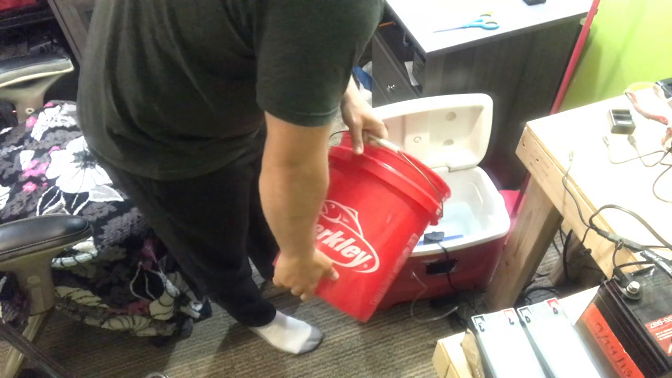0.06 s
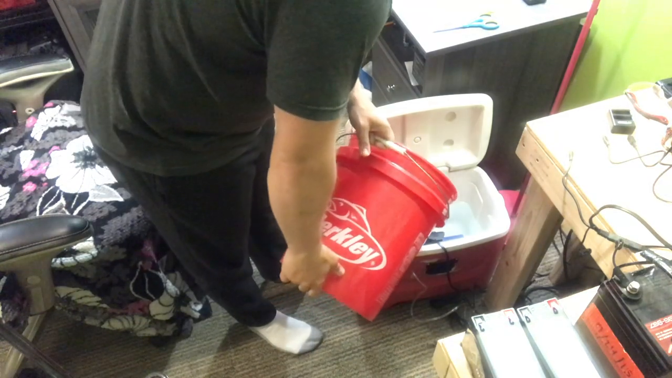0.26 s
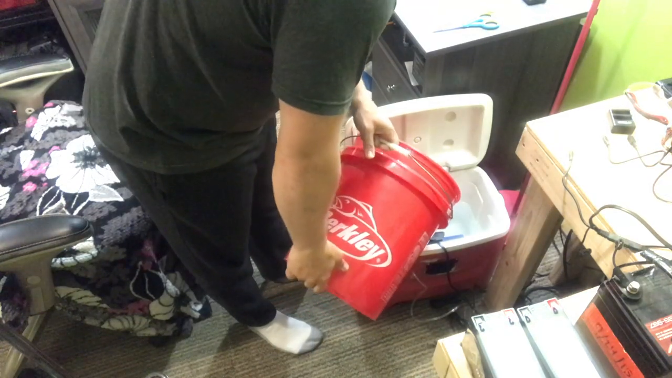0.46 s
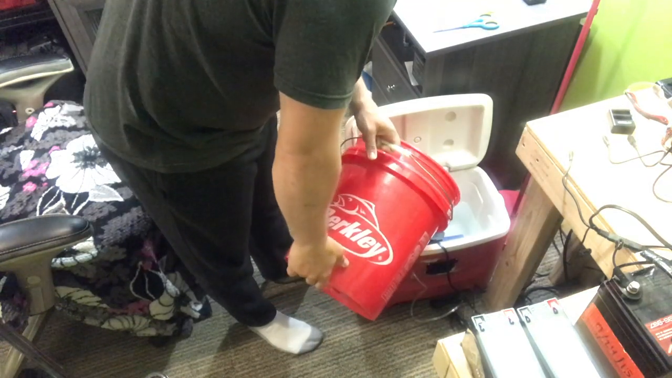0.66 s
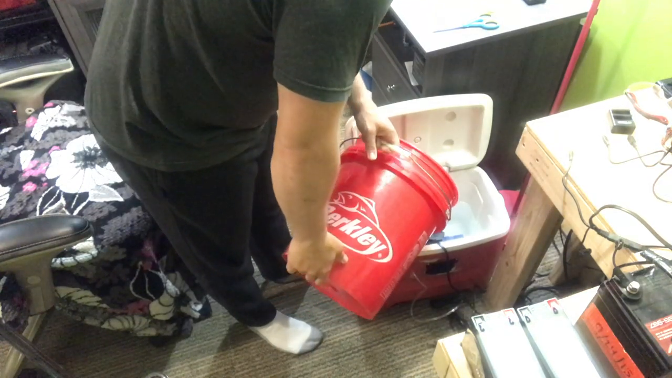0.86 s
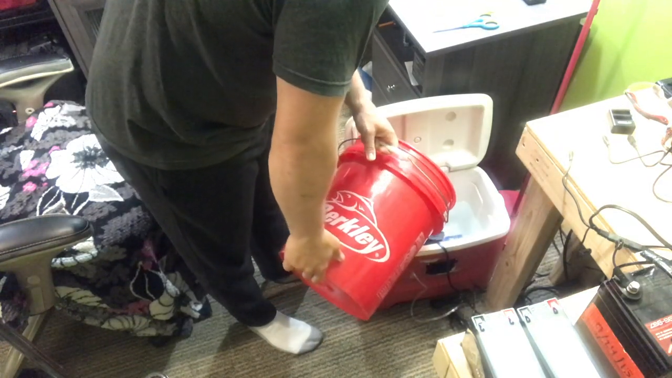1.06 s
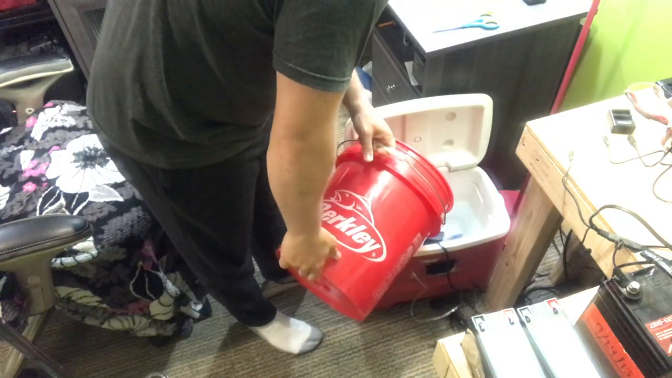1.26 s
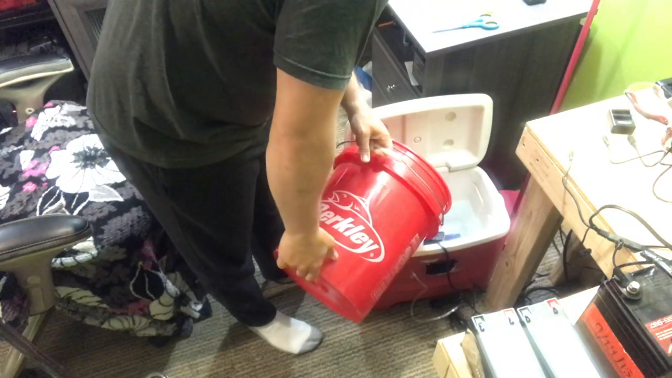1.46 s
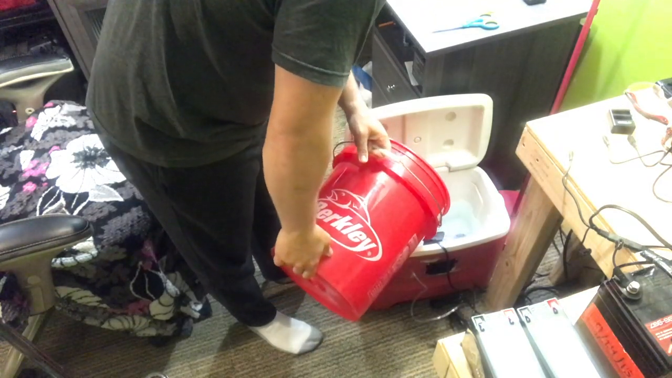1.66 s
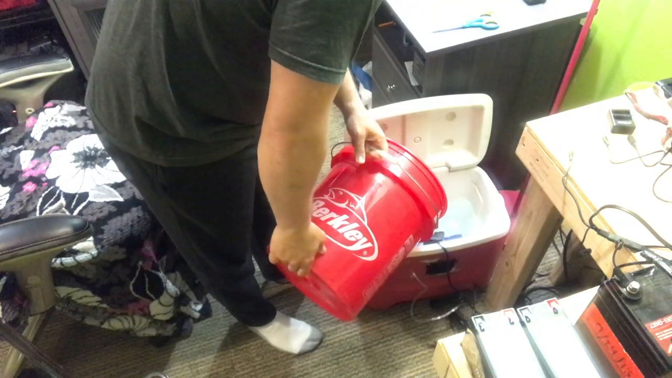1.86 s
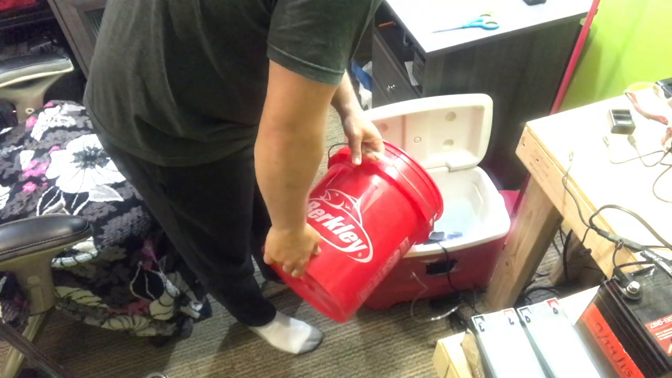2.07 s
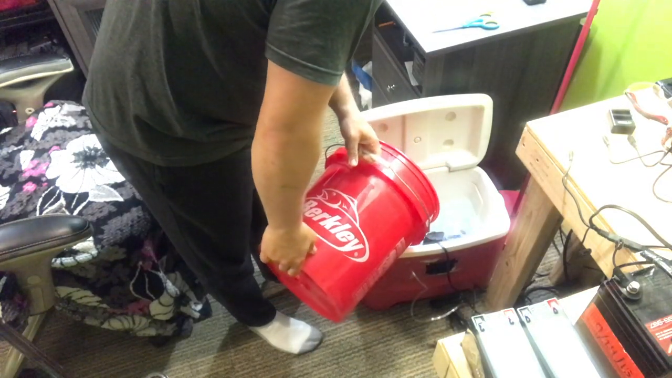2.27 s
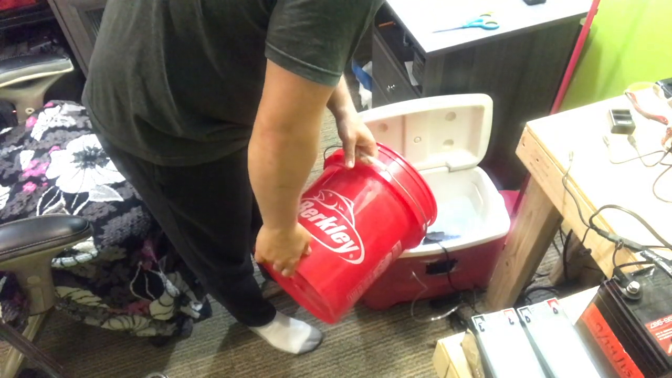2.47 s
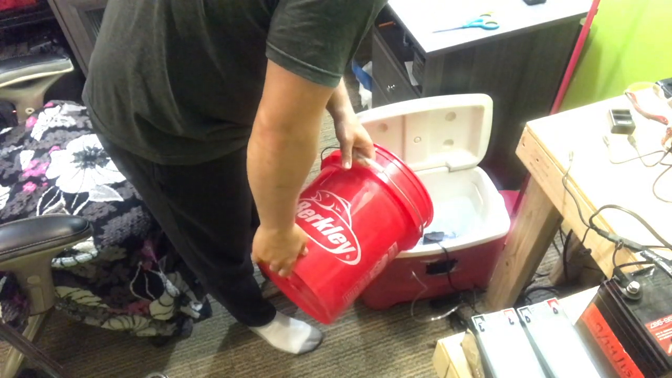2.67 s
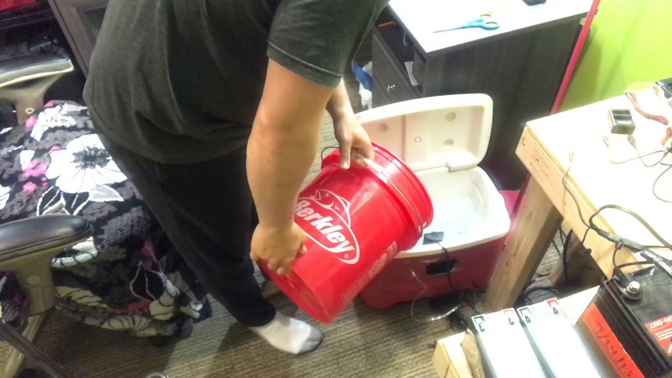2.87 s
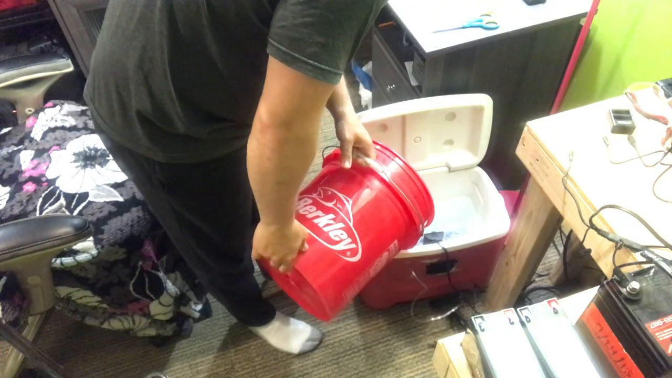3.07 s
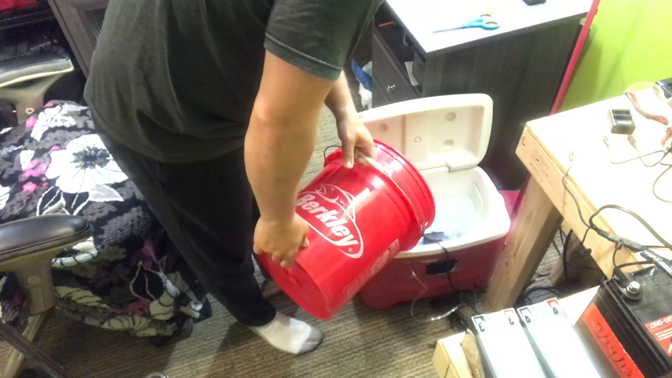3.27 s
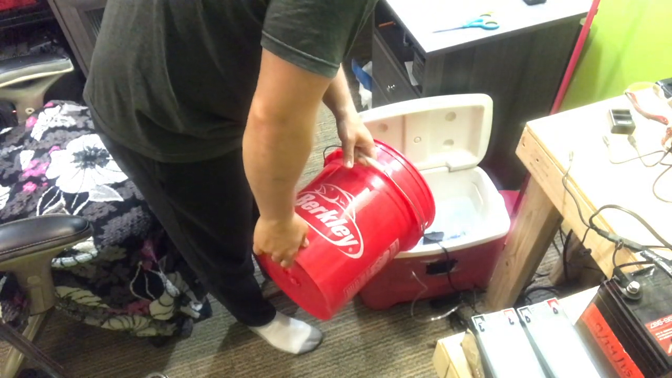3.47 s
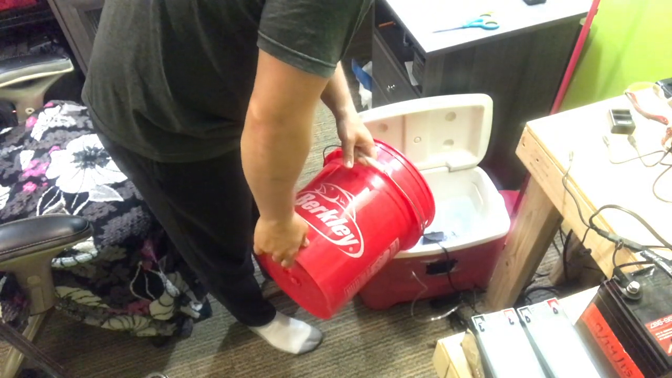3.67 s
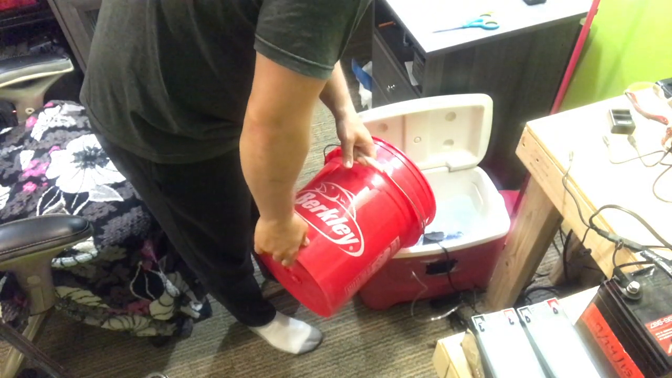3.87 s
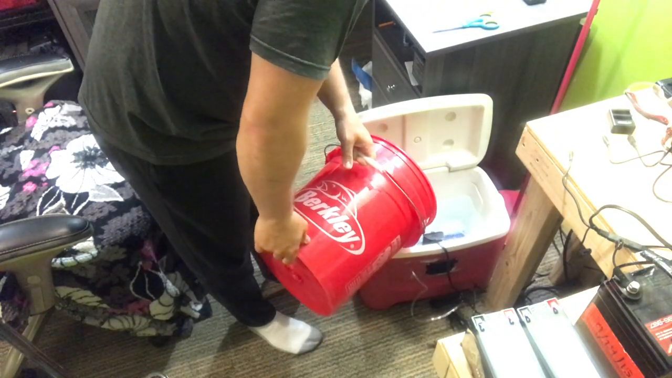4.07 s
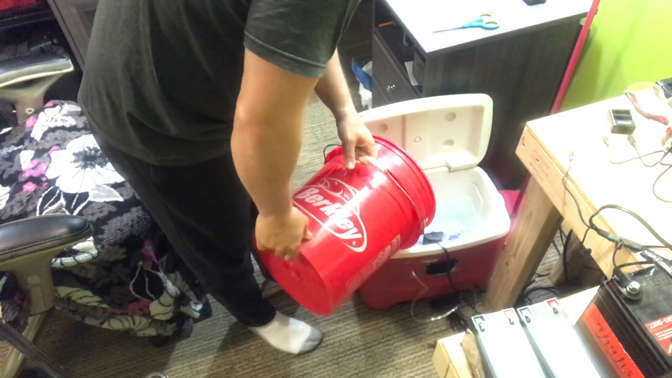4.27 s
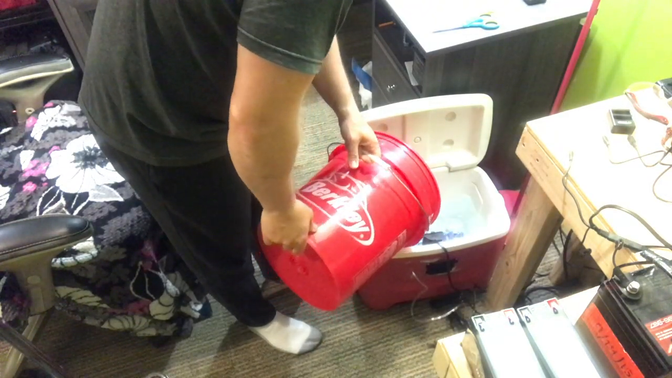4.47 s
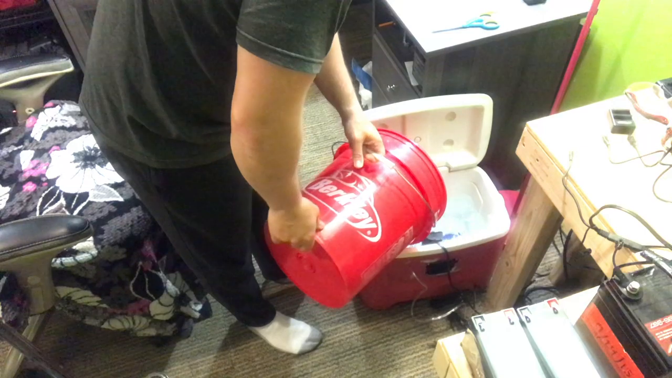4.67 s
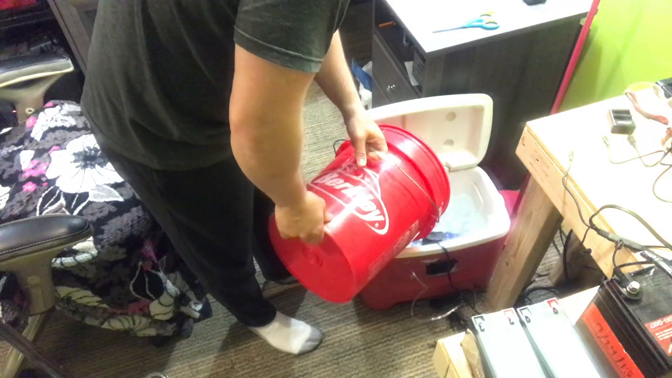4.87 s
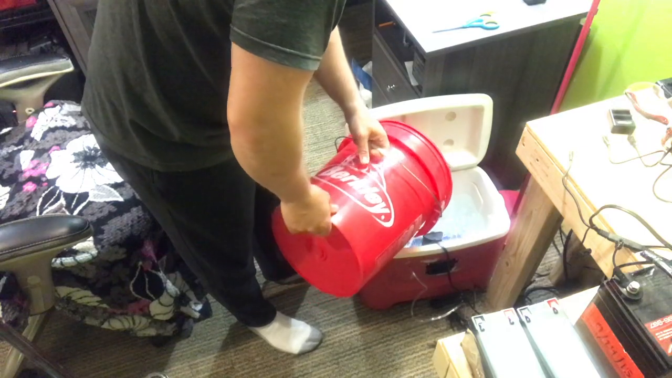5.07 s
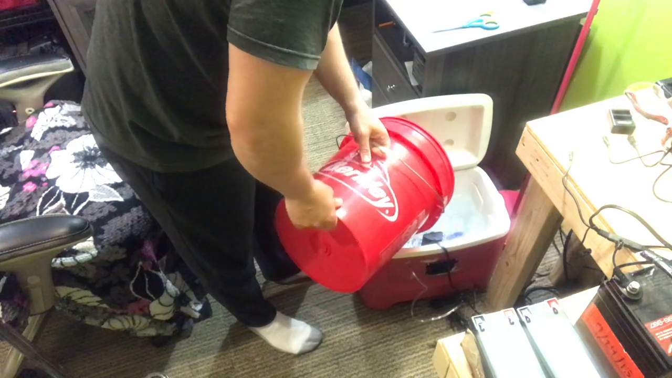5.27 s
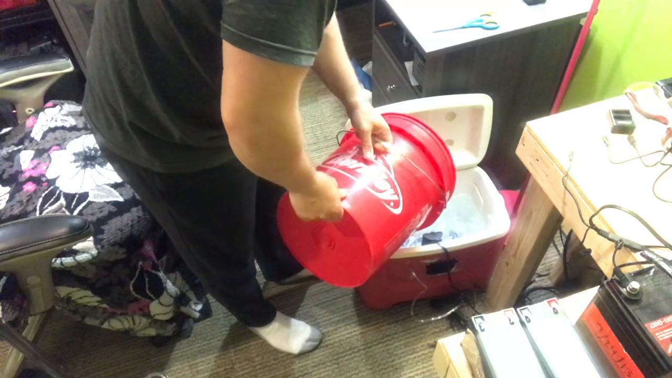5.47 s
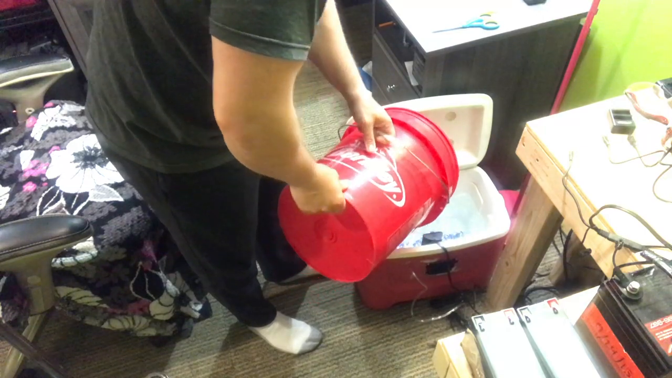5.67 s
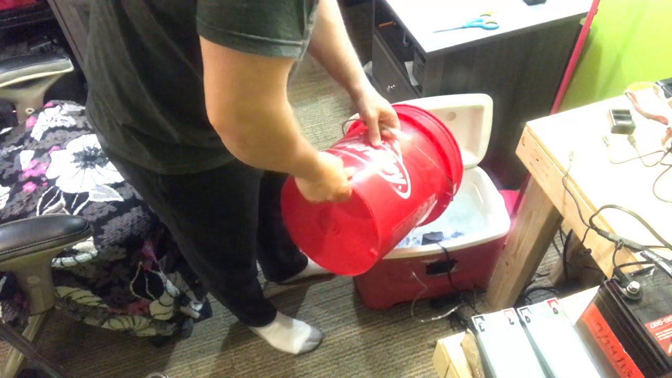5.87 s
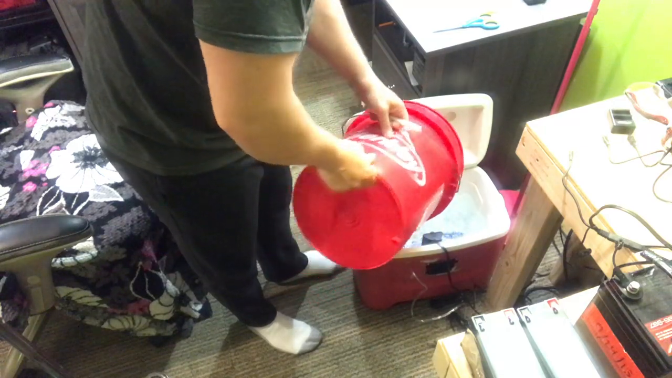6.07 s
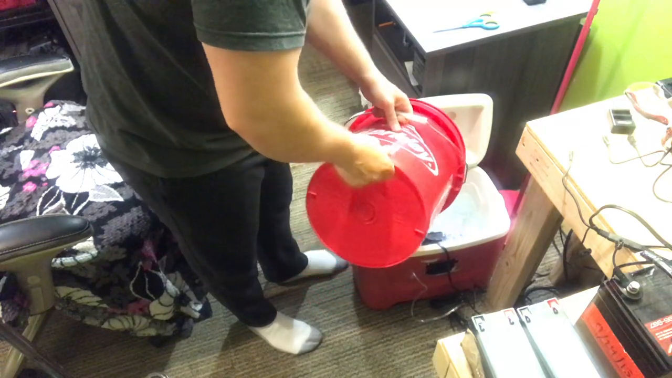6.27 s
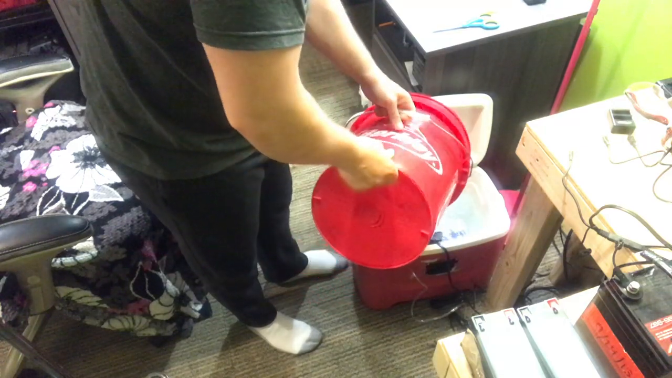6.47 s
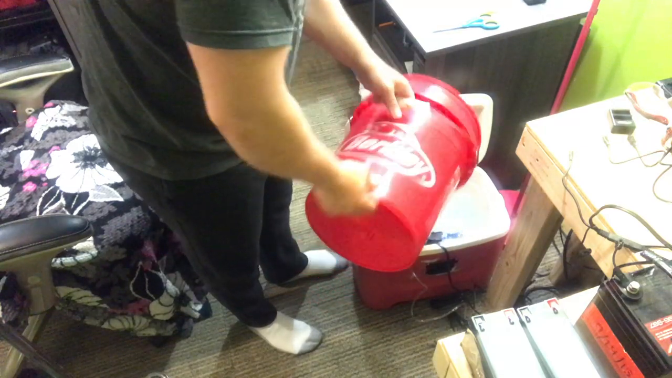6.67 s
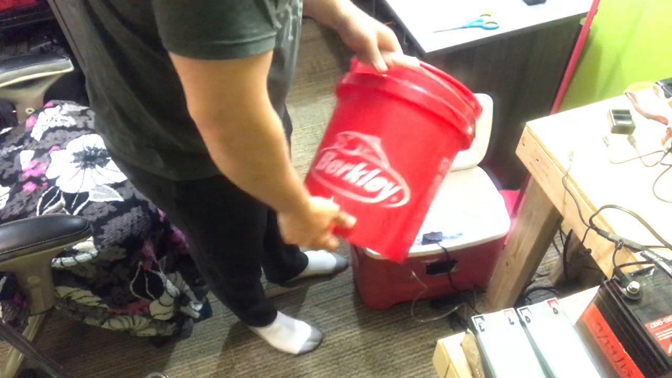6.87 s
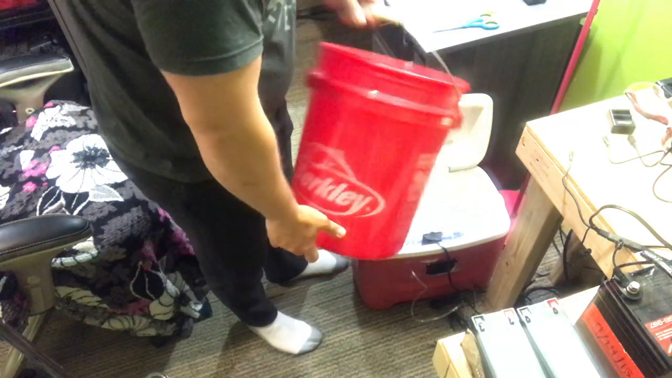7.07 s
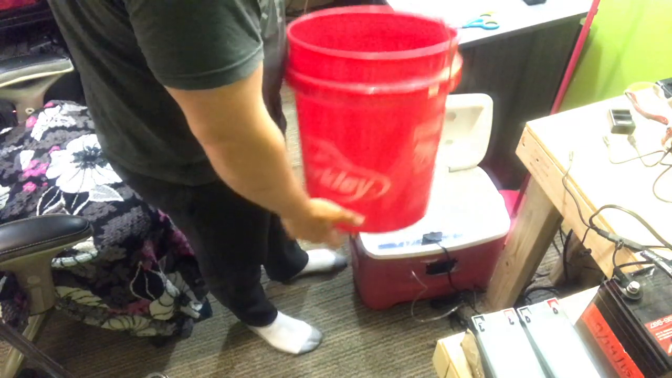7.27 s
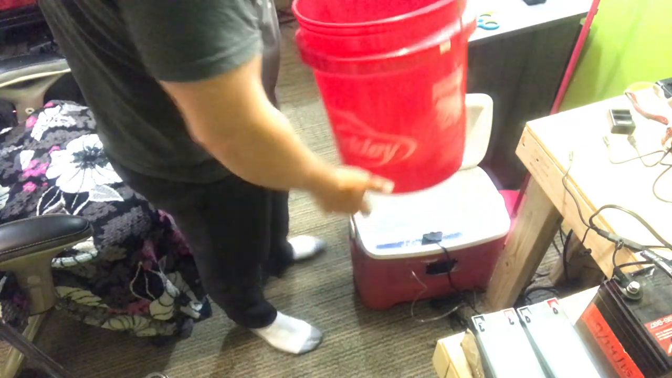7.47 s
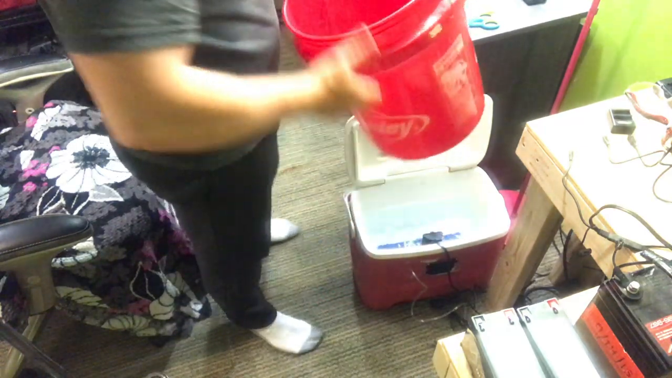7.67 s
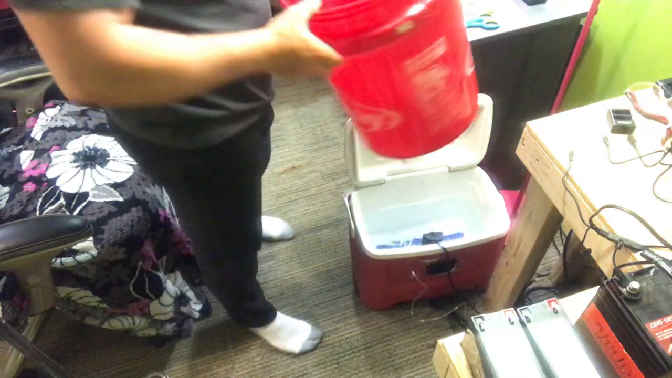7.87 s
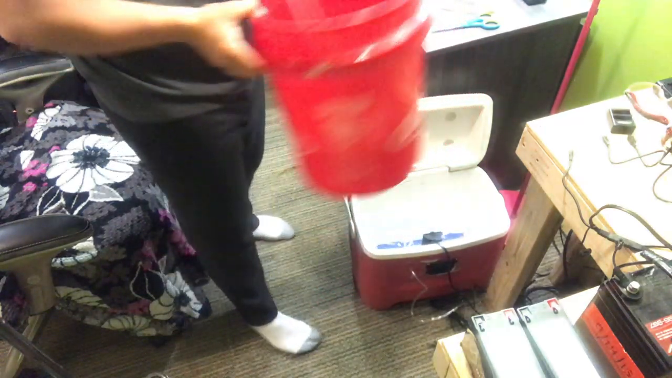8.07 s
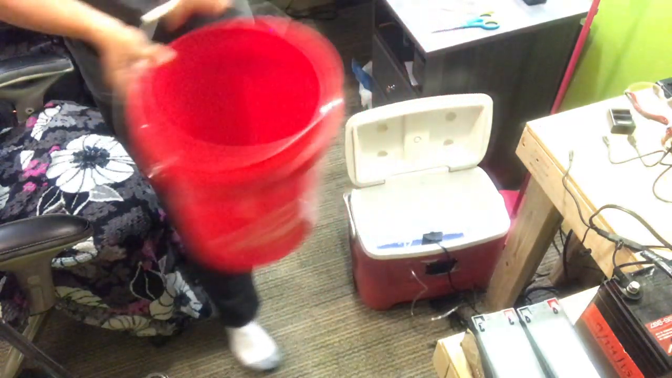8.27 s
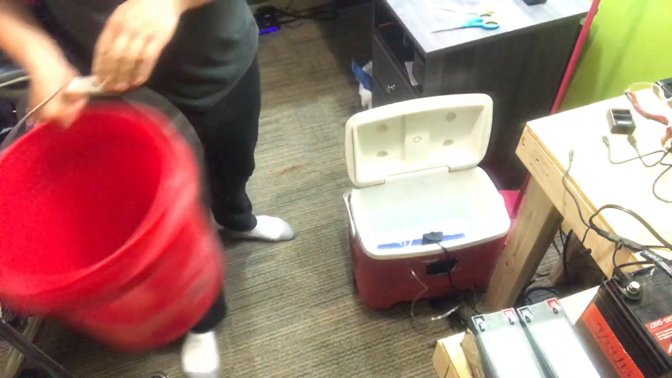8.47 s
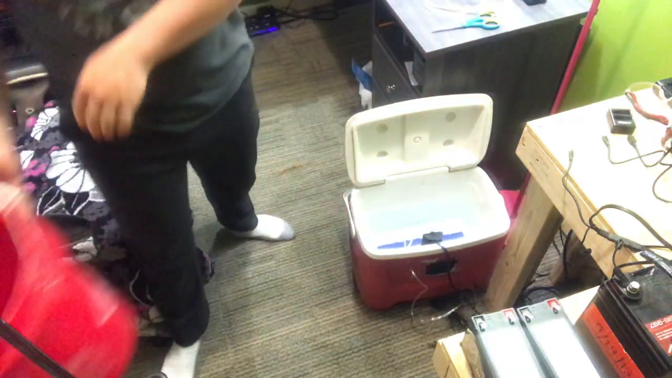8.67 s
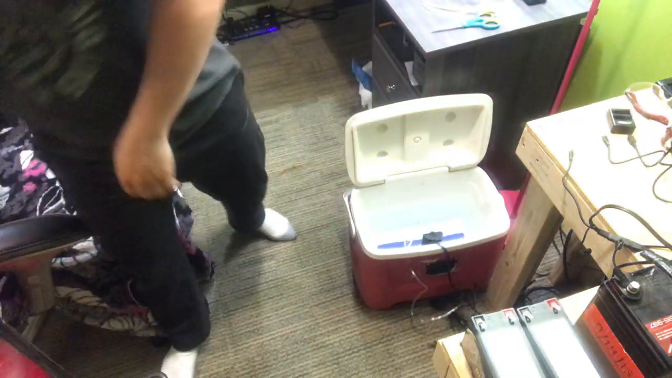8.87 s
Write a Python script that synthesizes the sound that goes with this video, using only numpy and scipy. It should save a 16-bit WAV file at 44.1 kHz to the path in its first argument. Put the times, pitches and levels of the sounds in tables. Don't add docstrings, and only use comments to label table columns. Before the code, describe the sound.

Water slops and then pours from a plastic bucket into a half-full plastic cooler, thins to drips, then the empty bucket knocks and rattles.

```python
import sys
import numpy as np
from scipy import signal
from scipy.fft import rfft, irfft, next_fast_len
from scipy.io import wavfile
from scipy.ndimage import uniform_filter1d

SR = 44100
rng = np.random.default_rng(int(sys.argv[2]) if len(sys.argv) > 2 else 0)


def file_out(sig):
    cols = np.atleast_2d(sig).T
    lim = np.clip(cols, -1, 1)
    pcm = np.round(lim * 32767).astype(np.int16)
    wavfile.write(sys.argv[1], SR, pcm)


def to_linear_factor(level_db):
    exponent = np.asarray(level_db, float) / 20
    return 10 ** exponent


N = 392921
LOW_HZ, TOP_HZ = 41, 15830
POUR_END_S = 5.7


def unit(x):
    return x / np.sqrt(np.mean(x ** 2) + 1e-20)


def along(points, hz):
    f, v = np.transpose(points)
    return np.interp(np.log(hz + 1), np.log(f + 1), v)


def filtered(x, response):
    m = next_fast_len(N + 8192)
    return irfft(rfft(x, m) * response(np.fft.rfftfreq(m, 1 / SR)), m)[:N]


def band(low_hz, high_hz):
    return lambda f: 1 / (1 + (low_hz / (f + 1)) ** 8) / (1 + (f / high_hz) ** 8)


def noise_through(response):
    return unit(filtered(rng.standard_normal(N), response))


def hiss(spectrum):
    return noise_through(lambda hz: to_linear_factor(along(spectrum, hz)))


def swells(rows, share):
    t = np.arange(0, N, 20) / SR
    gain = np.zeros(len(t))
    for s, db, extra_db, rise_s, fall_s in rows:
        away = np.where(t < s, (s - t) / rise_s, (t - s) / fall_s)
        gain += to_linear_factor(db + share * extra_db - 60 * away)
    return np.repeat(gain, 20)[:N]


def bubbles(s, gain, hz, cycles, rise, size, hold=1, onset=1.0, late=1):
    t = np.arange(size) / SR
    age = t * (hz / np.maximum(cycles, 1))[:, None]
    turns = hz[:, None] * t * (1 + rise * np.minimum(age, 1) ** late)
    envelope = gain[:, None] * to_linear_factor(-60 * age ** hold) * (1 - np.exp(-turns / onset))
    wave = envelope * np.sin(2 * np.pi * turns)
    at = np.round(s * SR).astype(int)[:, None] + np.arange(size)
    return np.bincount(at.ravel(), wave.ravel(), N + size)[:N]


# f/Hz, width/Hz, level/dB
AIR_MODES = [(320, 43, 1), (410, 75, 4), (560, 80, 4.5), (1020, 140, 0.5), (1470, 150, 7.5), (2160, 160, 4),
             (2720, 140, 2), (3290, 170, 1), (4200, 140, 3)]


def air(f):
    return sum(db / (1 + (2 * (f - hz) / width_hz) ** 2) for hz, width_hz, db in AIR_MODES)


# f/Hz, density/dB per Hz
WATER_COLOUR = [(120, -61), (200, -7.5), (305, -11.5), (372, -7), (567, -8.5), (760, -11), (1490, -7),
                (1860, -11.5), (2400, -7.5), (3050, -8), (4480, -4.5), (10400, -31), (11800, -29.5),
                (15800, -33.5)]


def stream():
    classes = [
        swarm(228.4, 823, cycles=13.0, scatter_db=2.5, wash=0.94, count=1100, size=2200),
        swarm(768.5, 2485, cycles=22.7, scatter_db=3.0, wash=0.72, count=2600, size=1200),
        swarm(2420, 7660, cycles=20.5, scatter_db=4.0, wash=0.54, count=8000, size=360),
        swarm(5350, TOP_HZ, cycles=13, scatter_db=4.5, wash=1.03, count=9000, size=70)]
    surges = [
        surge(BIG + GURGLES, db=-22.0, t60=0.27),
        surge(MIDDLE + CHIRPS, db=-19.5, t60=0.076),
        surge(SMALL, db=-21.5, t60=0.11) + surge(FINE, db=-15.5, t60=0.076),
        surge(SMALL, db=-39.0, t60=0.14) + surge(SPECKS, db=-20.5, t60=0.09)]
    colour = lambda f: to_linear_factor(along(WATER_COLOUR, f) + air(f))
    out = np.zeros(N)
    for gain, more, x in zip(flow(), surges, classes):
        out += (gain + more) * unit(filtered(x, colour))
    return out


def swarm(low_hz, high_hz, cycles, scatter_db, wash, count, size):
    u = rng.random((count, 4))
    hz = low_hz * (high_hz / low_hz) ** u[:, 1]
    gain = to_linear_factor(-scatter_db * np.log(1 - .98 * u[:, 2])) * hz / low_hz
    ring_cycles = cycles * (0.25 + 1.85 * u[:, 3])
    many = bubbles(u[:, 0] * POUR_END_S, gain, hz, ring_cycles, rise=0.18, size=size)
    pass_band = band(low_hz, high_hz)
    return unit(filtered(many, pass_band)) + wash * noise_through(pass_band)


def surge(rows, db, t60):
    s, peak_db, _ = np.transpose(rows)
    kicks = np.bincount(np.round(s * SR).astype(int), to_linear_factor(peak_db + db), N)
    t = np.arange(SR // 4) / SR
    return signal.fftconvolve(kicks, to_linear_factor(-60 * t / t60) * (1 - np.exp(-t / 0.0005)))[:N]


# t/s, flow/dB, plunge/dB (deeper entry favours large bubbles)
FLOW = [(0.83, -55, -21), (0.853, -33, -4.5), (0.962, -34, -4.5), (1.264, -31.5, 0), (1.5, -36, 2.5),
        (1.8, -35, 0), (2.2, -35.5, -5.5), (2.4, -39, 0), (2.734, -34.5, -6.5), (2.97, -39.5, 2),
        (3.4, -35.5, -1), (3.55, -35.5, -8), (3.99, -39.5, 0), (4.29, -37, -8), (4.68, -38, -1),
        (5.18, -39.5, 2.5), (5.61, -44, 4.5), (5.68, -60, -14)]
# t/s, depth/dB, half width/s
LULLS = [(1.05, 8, 0.052), (1.45, 5.5, 0.032), (1.88, 3, 0.043), (2.81, 7, 0.043), (3.24, 6, 0.12),
         (4.02, 4, 0.096), (4.5, 3, 0.072)]
# peak t/s, flow/dB, plunge/dB, rise/s per 60 dB, fall/s per 60 dB
SLOPS = [
    (0.537, -30, -13, 0.092, 0.3),
    (0.577, -36, -10, 0.03, 0.2),
]
# level over flow/dB, share of plunge/1
SIZES = [
    (-15.5, 0.97),
    (-4.5, 0.65),
    (-1, 0.024),
    (-10.5, 0.014),
]


def flow():
    t = np.arange(N) / SR
    s, flow_db, plunge_db = np.transpose(FLOW)
    lull_db = sum(db * np.exp(-((t - at) / half_s) ** 2) for at, db, half_s in LULLS)
    level_db = np.interp(t, s, flow_db, -120, -120) - lull_db
    plunge_db = np.interp(t, s, plunge_db)
    return [to_linear_factor(db) * (to_linear_factor(level_db + share * plunge_db) + swells(SLOPS, share)) for db, share in SIZES]


# t/s, peak level/dB, f/Hz
GLUGS = [(0.97, -31.5, 366), (1.021, -33, 309), (1.3, -36, 318), (1.404, -31.5, 300), (1.746, -33, 326)]
BIG = [(0.651, -27, 521), (0.905, -32, 488), (0.967, -31, 447), (1.011, -36, 405), (1.123, -25, 512),
       (1.325, -29, 357), (1.958, -35, 880), (2.946, -32.5, 418), (3.433, -33, 566), (3.672, -28.5, 524),
       (4.207, -34.5, 570), (4.686, -38, 570), (5.466, -34, 570), (5.527, -25.5, 490)]
GURGLES = [(1.25, -38, 415), (1.485, -38, 498), (1.674, -40, 493), (2.019, -31, 560), (2.325, -40, 547),
           (2.355, -39, 519), (2.558, -38, 555), (2.644, -39.5, 543), (2.739, -39, 568), (3.112, -41, 581),
           (3.795, -39, 563), (4.293, -37.5, 622), (4.74, -33, 550), (4.948, -37, 540)]
MIDDLE = [(0.5308, -28, 2050), (0.9244, -20.5, 1487), (0.9623, -17.5, 1195), (1.2258, -18, 1500),
          (1.245, -20.5, 1030), (1.3065, -21.5, 1470), (1.56, -24.5, 1054), (1.5864, -24, 1500),
          (2.088, -21, 1900), (2.5896, -23, 1434), (2.9463, -22, 1335), (3.0205, -23, 1443),
          (3.3556, -22, 1280), (3.482, -24, 1340), (3.553, -27.5, 1460), (3.706, -25.5, 1470),
          (3.8263, -18, 1326), (3.8697, -22.5, 1375), (4.0478, -28, 1457), (4.278, -28, 1460),
          (4.408, -26.5, 1640), (4.5665, -21.5, 1420), (4.628, -20.5, 1434), (4.6631, -17, 1440),
          (4.7796, -24, 1345), (4.8826, -23, 1490), (4.9418, -23, 1640), (5.0866, -23, 1420),
          (5.1354, -20.5, 2100), (5.5094, -18.5, 1493)]
CHIRPS = [(0.5551, -33, 1670), (0.8719, -30.5, 1515), (0.8872, -26, 1680), (1.1056, -31, 1380),
          (1.1463, -33, 1450), (1.1752, -28, 1500), (1.1892, -26, 1500), (1.3987, -31, 1510),
          (1.467, -30, 1500), (1.535, -28, 1450), (1.6287, -30, 1460), (1.645, -30, 1460),
          (1.7554, -35, 1560), (1.909, -33, 1640), (1.961, -28, 1530), (2.13, -29, 1500),
          (2.4947, -34, 1340), (2.845, -32.5, 1420), (3.2625, -30.5, 1434), (3.4, -27, 1463),
          (3.9185, -34, 1450), (4.168, -35, 1510), (4.2372, -30, 1410), (4.2921, -31, 1460),
          (4.4523, -32.5, 1300), (5.0629, -37, 1380), (5.312, -29, 1550), (5.3662, -33, 1530)]
PINGS = [(0.5736, -27, 1960), (0.8469, -27, 2830), (1.2026, -26, 2820), (1.3094, -28.5, 1900),
         (1.3603, -28, 2050), (1.6361, -27, 1950), (1.7713, -32, 2670), (2.0377, -32, 1970),
         (2.3979, -29, 2750), (2.4139, -25.5, 2750), (2.5695, -23, 2650), (2.8519, -28.5, 2150),
         (2.9417, -29, 2720), (3.0809, -27, 2090), (3.5762, -28, 2160), (0.701, -32, 3050),
         (0.699, -40, 2380), (0.55, -26, 3000), (0.678, -40, 1080), (4.4702, -24, 2800),
         (4.6283, -28, 1980), (4.9391, -29, 2550), (5.0289, -27.5, 2030), (5.1122, -30, 2130)]
SMALL = [(0.9019, -9, 4430), (0.9608, -14, 5960), (1.1209, -25, 3640), (1.1916, -14, 4400),
         (1.325, -11, 3420), (1.3744, -14.5, 3140), (1.741, -14.5, 4870), (1.9813, -17.5, 3010),
         (2.178, -18, 4840), (2.3298, -13.5, 3670), (2.3692, -16, 4190), (2.4583, -15.5, 4110),
         (2.5395, -9, 2990), (2.652, -12.5, 4100), (2.6763, -16, 2720), (2.7478, -11.5, 3770),
         (3.0243, -16, 4700), (3.1123, -9, 4660), (3.385, -15, 4250), (3.733, -12.5, 3770),
         (3.857, -16.5, 4780), (3.9186, -16, 4400), (3.9698, -12.5, 4440), (4.1236, -11.5, 3790),
         (4.2262, -18.5, 4300), (4.8531, -14.5, 3910), (4.9417, -15, 4350), (5.1443, -7, 3290),
         (5.1893, -14.5, 3300), (5.3886, -7, 4470), (5.3895, -20.5, 4730)]
FINE = [(0.5367, -24, 4280), (0.85, -27, 3000), (0.953, -23, 4140), (1.0136, -24.5, 4270),
        (1.0893, -26, 3050), (1.5089, -24, 4700), (1.7835, -23, 4200), (1.8252, -25, 4430),
        (1.9599, -30, 3170), (2.112, -19, 4200), (2.3126, -25, 3740), (2.5885, -22, 4100),
        (2.7147, -20, 3880), (2.8843, -28, 3840), (2.983, -20, 4800), (3.0579, -22, 4540),
        (3.2007, -25.5, 4180), (3.2945, -25, 4400), (3.4989, -21.5, 3770), (3.627, -27, 4200),
        (3.6945, -29, 4240), (4.1198, -19.5, 3680), (0.547, -22, 4100), (4.6244, -29, 3960),
        (4.6608, -20, 4200), (4.98, -20, 4460), (5.3127, -32, 4080), (5.438, -27, 4070),
        (5.6707, -38, 3920), (5.724, -36, 4270)]
SPECKS = [(1.045, -23, 5200), (1.2927, -27, 5950), (2.019, -31, 5640), (2.247, -27, 5450),
          (2.4232, -28, 5450), (2.523, -28, 5770), (2.6971, -23, 6040), (3.008, -26, 5840),
          (3.17, -24, 6300), (3.5586, -26, 5500), (3.61, -26, 5670), (3.7098, -19.5, 5200),
          (3.8974, -21, 5430), (4.05, -26, 5400), (4.365, -25, 5030), (4.4506, -28, 4900),
          (5.2098, -31, 5650), (5.2343, -22, 7500), (5.4603, -23, 5660)]
TICKS = [(5.7513, -28, 5800), (6.2073, -34, 4080), (6.5894, -39, 6100), (6.755, -34, 4280)]


def pops():
    kinds = [  # rows, samples, dB, cycles to die, pitch rise, onset in cycles
        (GLUGS, 7000, -0.5, 30, .1, 1.9), (BIG, 5000, -2.5, 52, .25, 1.9),
        (GURGLES, 4000, -1.5, 30, .15, 1.9), (MIDDLE, 2500, -4, 55, .06, 2.5),
        (CHIRPS + PINGS, 1600, -0.5, 45, .06, 2.5), (SMALL, 1200, 1.5, 40, .08, 3.5),
        (FINE, 800, 3, 40, .08, 3.5), (SPECKS, 500, 3, 35, .1, 2.5), (TICKS, 1200, 0.5, 25, .1, 1.9)]
    out = np.zeros(N)
    for rows, size, db, cycles, rise, onset in kinds:
        s, peak_db, hz = np.transpose(rows)
        out += bubbles(s, to_linear_factor(peak_db + db), hz, cycles + 0 * hz, rise, size=size, hold=0.85, onset=onset)
    wobble = uniform_filter1d(uniform_filter1d(rng.standard_normal(N), 200), 200)
    return out * to_linear_factor(1.2 * unit(wobble) - 0.2)


# t/s, peak level/dB, centre f/Hz, spray level/dB
SPLASHES = [(0.5061, -30.5, 4000, -59), (0.72, -40, 4200, -64), (0.9615, -10.5, 5700, -49),
            (1.3985, -20, 3250, -53), (2.1768, -16, 5500, -43.5), (2.7116, -26, 3900, -51),
            (2.849, -22.5, 3630, -68), (2.944, -24.5, 2800, -64), (3.023, -15, 4900, -48),
            (3.111, -19, 4750, -51), (3.842, -19, 4510, -49), (4.278, -18.5, 3950, -52),
            (4.451, -17, 6200, -51), (4.5743, -19.5, 4250, -54), (5.078, -21, 4530, -50),
            (5.313, -18, 5100, -50), (5.6328, -19.5, 6200, -54), (5.669, -36, 7600, -60),
            (5.975, -38, 1400, -80), (6.38, -44, 8000, -70), (6.575, -44, 8200, -70),
            (6.765, -42, 7900, -75), (6.91, -50, 13800, -80), (5.776, -31, 3950, -54.5),
            (5.8212, -20.5, 4540, -53), (5.851, -24.5, 6100, -68), (5.947, -35, 4040, -76),
            (6.054, -34.5, 7140, -59), (6.335, -33, 4700, -56), (6.4981, -21, 3430, -61.5),
            (6.677, -32.5, 2190, -64), (6.855, -38.5, 6060, -74), (6.941, -38, 4140, -81),
            (7.1036, -36.5, 4520, -70), (7.1786, -42, 2340, -55)]


def splashes():
    soft_db_per_khz = -2
    out, t = np.zeros(N), np.arange(2048) / SR
    f = np.fft.rfftfreq(len(t), 1 / SR)
    for s, peak_db, hz, spray_db in SPLASHES:
        z = rfft(rng.standard_normal((2, len(t))))
        puff = unit(irfft(z[0] / (1 + ((f - hz) / (0.28 * hz)) ** 4)))
        colour_db = along(WATER_COLOUR, f) + soft_db_per_khz * f / 1000 * (s > POUR_END_S)
        spray = unit(irfft(z[1] * (f > 6500) * to_linear_factor(colour_db)))
        burst = to_linear_factor(peak_db - 13.5 - 60 * t / 0.072) * puff
        burst += to_linear_factor(spray_db + 7.5 - 60 * t / 0.1) * spray * (1 - np.exp(-t / 0.0015))
        out[round(s * SR):][:len(t)] += burst * (1 - np.exp(-t / 0.000087))
    return out


# t/s, peak level/dB, f/Hz, decay/cycles
DRIPS = [(5.78, -45, 880, 50), (5.83, -55, 960, 60), (5.89, -53, 1020, 97), (5.918, -52, 1600, 40),
         (5.948, -30, 1560, 11), (6.336, -43.5, 815, 110), (6.421, -54, 1200, 19), (6.504, -55, 1173, 83),
         (6.632, -63, 1054, 58), (6.676, -43, 2150, 32), (6.826, -52.5, 968, 56), (7.553, -53, 970, 15)]


def drips():
    s, peak_db, hz, cycles = np.transpose(DRIPS)
    tremble = to_linear_factor(3.8 * unit(uniform_filter1d(rng.standard_normal(N), 300)))
    tick = bubbles(s, to_linear_factor(peak_db + 14.0), 1.77 * hz, 3.6 + 0 * hz, rise=.3, size=200, onset=0.32)
    ring = bubbles(s, to_linear_factor(peak_db - 0.5), hz, cycles, rise=0.1, size=6000, hold=2.13, late=2.64)
    return tick + tremble * ring


# f/Hz, density/dB per Hz
AFTER_COLOUR = [(120, -35), (200, -3), (316, -3), (346, -1), (746, -24), (1120, -8.5), (3460, -8.5),
                (4310, -4.5), (15800, -38)]
# peak t/s, level/dB, low rustle/dB, rise/s per 60 dB, fall/s per 60 dB
RUSTLES = [
    (5.962, -54.5, -27, 1.2, 0.15),
    (6.07, -75, 12, 0.41, 0),
    (7.392, -54.5, -7.5, 4.3, 1),
]


def settling():
    foam_db, foam_fade_db_per_s, rustle_top_db = -52.5, 11.5, -5
    since_s = np.arange(N) / SR - POUR_END_S
    foam = to_linear_factor(foam_db - foam_fade_db_per_s * since_s) * (since_s > -.1)
    rustle, low = swells(RUSTLES, 0), swells(RUSTLES, 0.85)
    noise = hiss(AFTER_COLOUR)
    part = lambda low_hz, high_hz: unit(filtered(noise, band(low_hz, high_hz)))
    treble = (foam + to_linear_factor(rustle_top_db) * rustle) * part(3550, 16000)
    return rustle * part(620, 3400) + low * part(190, 1300) + treble


# t/s, peak level/dB, click/dB, thud of low modes/dB, edge of high modes/dB
KNOCKS = [(7.706, -32, -52, -2, -1), (7.728, -24.5, -39, -3, -2), (7.786, -48, -44, 0, 14),
          (7.801, -48, -43, 0, 20), (7.879, -46, -47, 5, 13), (7.962, -52, -56, -6, 10),
          (8.074, -44, -53, -3, 0), (8.14, -34.5, -52, 5, 0), (8.198, -27, -60, 0, -1),
          (8.329, -42, -54, -6, -4), (8.354, -34, -37, 8, 10), (8.397, -23.5, -57, -2.5, 0.5),
          (8.471, -24.5, -47, -6, 1), (8.492, -32, -50, -6, 0), (8.522, -21, -40, -3, 2),
          (8.537, -28, -44, -8, 0), (8.554, -34, -47, -2, 19), (8.583, -32, -21, -3, 11),
          (8.659, -38.5, -57, 0, 1), (8.689, -44, -53, -7, 0)]
# f/Hz, level/dB, t60/s
WALL = [(222, -9.5, 0.16), (485, -10, 0.12), (785, -12, 0.17), (977, 7, 0.085), (1052, 5.5, 0.042),
        (1150, 2.5, 0.065), (1280, -5, 0.097), (1532, -3, 0.085), (1990, -3, 0.036), (2216, -6, 0.054),
        (2780, -25, 0.1), (3430, -17, 0.044), (4400, -18, 0.039), (5240, -20, 0.032)]
# f/Hz, density/dB per Hz
RUB_COLOUR = [(120, -27), (200, -19), (328, -13.5), (477, -20.5), (725, -15), (889, -19), (969, -3),
              (1040, -4.5), (2600, -13), (3380, -64), (5720, -120)]
BRIGHT_COLOUR = [(1350, -16), (2300, -2), (3500, -2.5), (4310, 0), (7000, -17.5), (11900, -36),
                 (15800, -32)]
# peak t/s, level/dB, brightness/dB, rise/s per 60 dB, fall/s per 60 dB
STROKES = [(7.705, -34.5, -2.5, 0.04, 0.23), (7.8, -48.5, 7, 0.074, 0.35), (8.005, -55, -12, 0.39, 0.7),
           (8.08, -57, -10, 0.26, 2), (8.36, -39, -5, 0.086, 0.1), (8.56, -31.5, -13.5, 0.44, 0.08),
           (8.59, -42.5, 8, 0.21, 0.37), (8.68, -35.5, -15, 0.096, 0.14), (8.85, -62.5, 7.5, 1.9, 16)]


def bucket():
    thud_hz, edge_hz, rub_ring_db = 900, 1400, -6.5
    out, t = np.zeros(N + SR), np.arange(SR // 4) / SR
    click = hiss(BRIGHT_COLOUR)
    soft = 1 - np.exp(-t / .0015)
    hz, db, t60 = np.transpose(WALL)[..., None]
    modes = to_linear_factor(db - 60 * t / t60) * np.sin(2 * np.pi * hz * t)
    for s, peak_db, click_db, thud_db, edge_db in KNOCKS:
        mode_db = thud_db * (hz < thud_hz) + edge_db * (hz > edge_hz) + rng.normal(0, 1.3, hz.shape)
        struck = to_linear_factor(mode_db) * rng.choice([-1, 1], hz.shape)
        at = round(s * SR)
        out[at:][:len(t)] += to_linear_factor(peak_db - 11.5) * (struck * modes).sum(axis=0) * soft
        out[at:][:len(t)] += to_linear_factor(click_db - 0.5 - 60 * t / 0.028) * click[at - len(t):at]
    rub, bright = swells(STROKES, 0), swells(STROKES, 1)
    grit = to_linear_factor(3.2 * unit(uniform_filter1d(rng.standard_normal(N), 100)))

    def ringing(f):
        return 1 + to_linear_factor(rub_ring_db) * (1 / (1 + ((f - hz[3:]) * t60[3:] / 1.1) ** 2)).sum(axis=0)

    scrape = grit * bright * click[::-1]
    rubbed = filtered(grit * rub * hiss(RUB_COLOUR), ringing)
    return out[:N] + to_linear_factor(-6.5) * scrape + to_linear_factor(-6.5) * rubbed


# t/s, level/dB, f/Hz, decay/cycles
BOOMS = [(6.028, -53.5, 128, 25), (6.04, -48.5, 210, 10), (7.704, -32.5, 111.7, 29), (7.712, -43, 217, 20),
         (7.724, -46, 490, 45), (7.79, -44, 110, 11), (7.87, -52.5, 116, 36), (8.119, -54.5, 115.8, 80),
         (8.531, -46, 114, 50), (8.655, -52, 780, 110), (8.584, -6.5, 4330, 8.6)]


def drum():
    s, db, hz, cycles = np.transpose(BOOMS)
    return bubbles(s, to_linear_factor(db), hz, cycles, rise=0, size=SR // 2, hold=2.32, onset=0.77)


# f/Hz, t60/s
BOX_T60 = [(300, 0.08), (1500, 0.074), (5000, 0.044), (14000, 0.026)]


def box(x, wet_db, modes):
    step = SR // 10
    parts = np.pad(x, (0, -N % step)).reshape(-1, step)
    hz, t, z = signal.stft(rng.standard_normal(parts.shape), SR, nperseg=128)
    decay = to_linear_factor(-60 * t / along(BOX_T60, hz)[:, None])
    tails = signal.istft(z * decay, SR, nperseg=128)[1][:, :step]
    tails = tails / np.linalg.norm(tails, axis=1, keepdims=True)
    wet = signal.fftconvolve(parts, tails, axes=1)
    head = np.pad(wet[:, :step].ravel(), (0, step))
    overhang = np.pad(wet[:, step:], ((0, 0), (0, 1))).ravel()
    joined = head + np.pad(overhang, (step, 0))
    delayed = np.pad(joined, (90, 0))[:N]
    return x + to_linear_factor(wet_db) * filtered(delayed, lambda f: to_linear_factor(modes * air(f)))


# f/Hz, density/dB per Hz
QUIET_COLOUR = [(15, -29), (25, -1), (55, -3), (116, -11), (316, -19), (382, -18.5), (572, -23),
                (2590, -29), (3390, -21), (3750, -23), (4200, -18), (4800, -26.5), (9990, -36.5),
                (11400, -31.5), (13100, -31.5), (15800, -34.5)]
# f/Hz, width/Hz, level/dB
HUM = [
    (46, 4.1, -63),
    (350.5, 5.8, -71),
]


def room():
    quiet_db = -56
    out = to_linear_factor(quiet_db - 1.0) * hiss(QUIET_COLOUR)
    for hz, width_hz, db in HUM:
        out += to_linear_factor(db) * noise_through(lambda f: 1 / (1 + (2 * (f - hz) / width_hz) ** 2))
    fade = 1 + np.exp(np.minimum((np.arange(N) / SR - .06) / 0.006, 50))
    return out + to_linear_factor(-58.0) / fade * hiss([(300, -1), (1000, -2), (6000, 2), (12000, -18)])


def ticking(rate_hz, start_s, db, low_hz, high_hz):
    k = np.arange(int((N / SR - start_s) * rate_hz))
    at = np.round((start_s + k / rate_hz) * SR).astype(int)
    gate = np.bincount(at, to_linear_factor(db(k) + 2.5 * rng.standard_normal(len(k))), N)
    gate = signal.fftconvolve(gate, signal.windows.hann(110))[:N]
    pass_band = band(low_hz, high_hz)
    return filtered(gate * noise_through(pass_band), pass_band)


def crackle():
    tick_db, weak_db, beacon_db = -59, -6, -61
    frame = ticking(59.936, .0087, lambda k: tick_db + weak_db * (k % 3 > 0), low_hz=10600, high_hz=13400)
    beacon = ticking(9.759, .0494, lambda k: beacon_db + 0 * k, low_hz=8500, high_hz=15500)
    return frame + beacon


def scene():
    water = to_linear_factor(-5) * stream() + to_linear_factor(-4.5) * settling() + to_linear_factor(3.0) * (pops() + drips()) + splashes()
    boxed = box(water, wet_db=-2.5, modes=0.23) + box(bucket(), wet_db=-5.0, modes=0)
    return (boxed + drum() + room() + crackle())[None]


def roll_off(x):
    return signal.sosfilt(signal.butter(12, 16390, fs=SR, output="sos"), x)


def record(dry):
    mix = filtered(dry[0], lambda f: (f < TOP_HZ) / (1 + (LOW_HZ / (f + 1)) ** 12))
    return roll_off(mix[None])


dry = scene()
out = record(dry)
file_out(out)
```